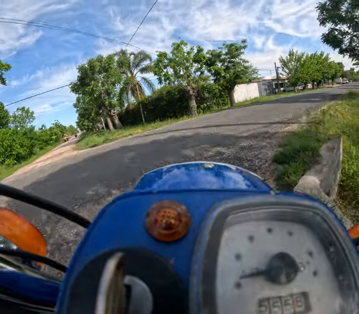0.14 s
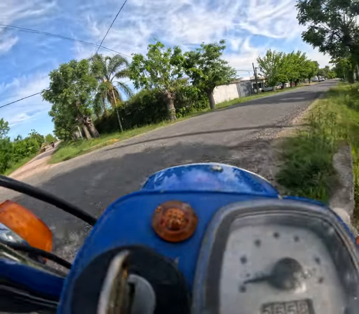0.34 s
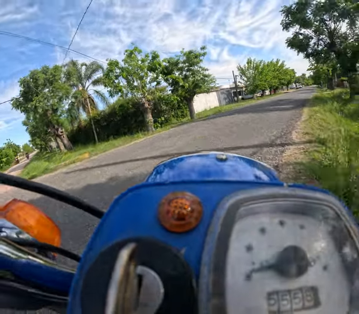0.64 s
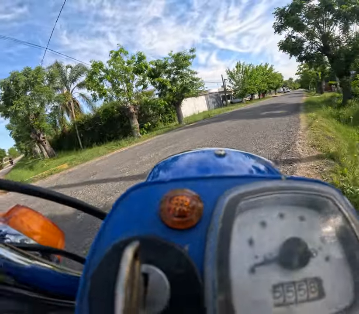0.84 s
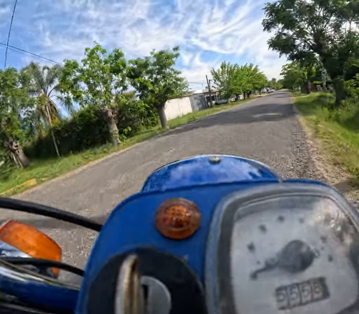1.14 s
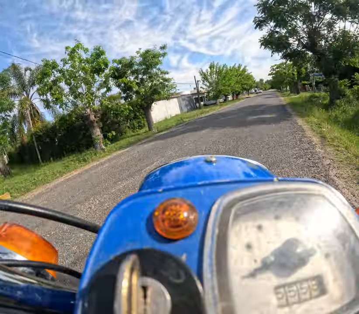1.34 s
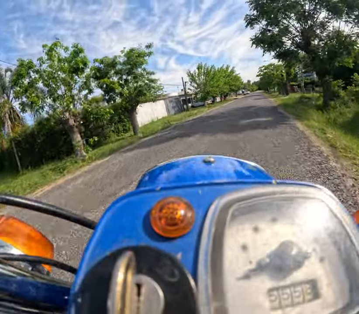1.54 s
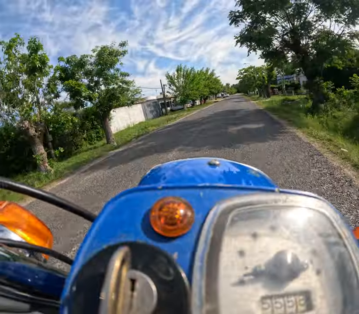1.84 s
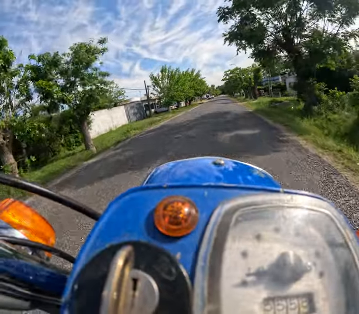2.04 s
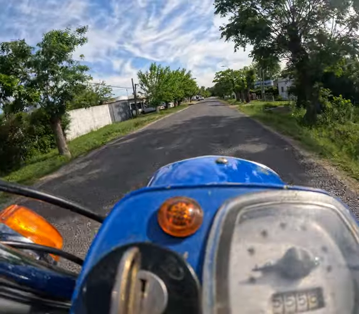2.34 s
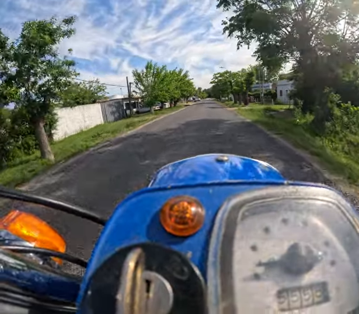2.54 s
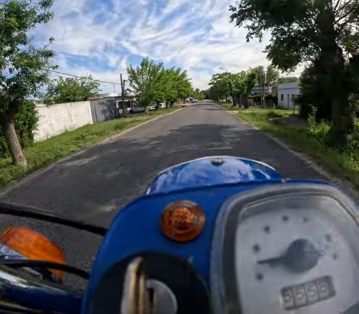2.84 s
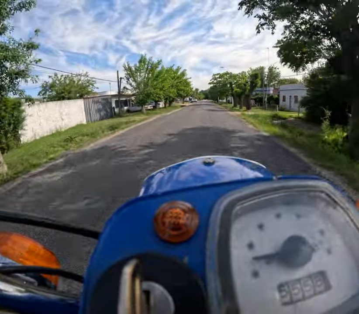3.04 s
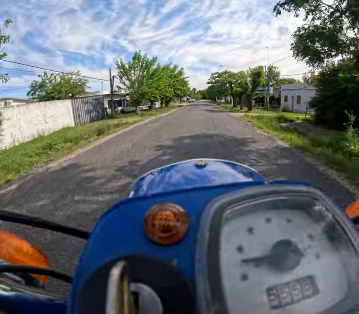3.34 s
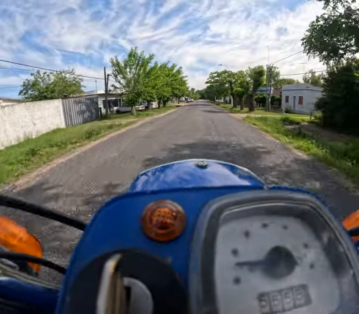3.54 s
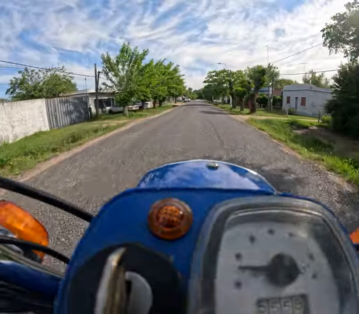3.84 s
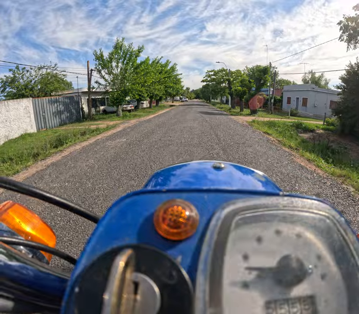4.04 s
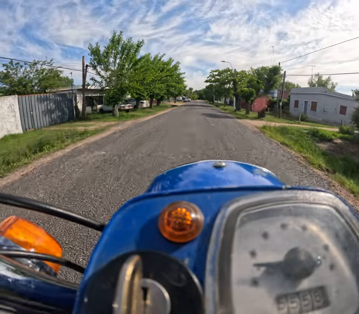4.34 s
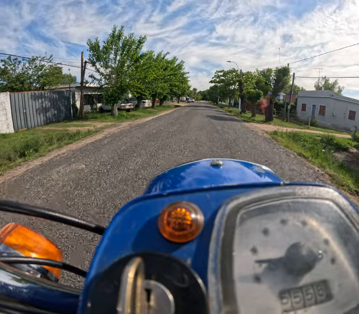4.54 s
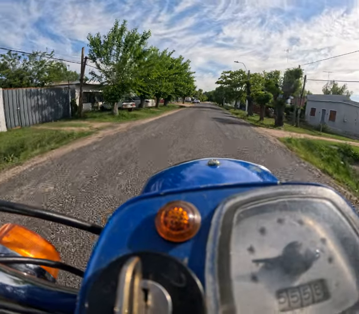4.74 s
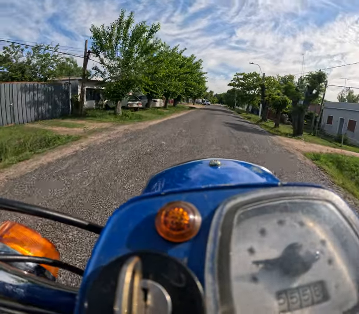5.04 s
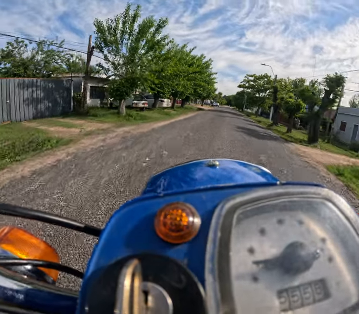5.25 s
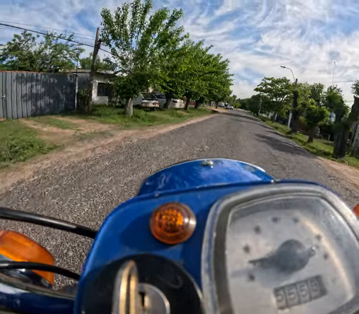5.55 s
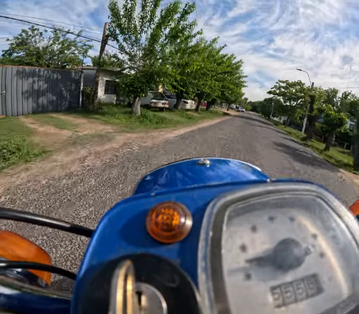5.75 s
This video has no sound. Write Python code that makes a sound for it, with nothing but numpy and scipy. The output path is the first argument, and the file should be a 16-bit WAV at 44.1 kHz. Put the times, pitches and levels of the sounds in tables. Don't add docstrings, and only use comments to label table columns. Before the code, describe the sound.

Close at the handlebar outdoors, a small two-stroke engine drones with a buzzing metallic rasp and rises slightly in pitch. Just before three seconds the throttle shuts, the drone drops away, and the moped coasts with irregular hollow silencer pops, low wind buffeting, loose panel knocks and small bright key rattles on the rough road.

```python
import sys
import numpy as np
from scipy import signal
from scipy.io import wavfile

SR = 44100
rng = np.random.default_rng(int(sys.argv[2]) if len(sys.argv) > 2 else 0)


def gain_from_decibels(decibels):
    exponent = np.asarray(decibels, float) / 20
    return 10 ** exponent


def master(y):
    cut = np.clip(np.atleast_2d(y).T, -1, 1)
    pcm = np.round(cut * 32767)
    wavfile.write(sys.argv[1], SR, pcm.astype(np.int16))


N = 259749

# start_s [s], firing_hz [Hz]
ENGINE_SPEED = [(0, 60), (.3, 63.3), (.63, 67.27), (.85, 70.1), (1.0, 71.45), (1.21, 73.4), (1.5, 73.84),
                (1.83, 74.1), (2.1, 71.98), (2.4, 70.8), (2.81, 68.8), (2.86, 67.66), (3.05, 60.84),
                (3.2, 57)]
# start_s [s], effort_db [dB]
METAL_EFFORT = [(0, -2.5), (.3, -3.5), (.88, 0.5), (1.58, -1.5), (2.6, -2), (2.82, -2), (2.88, -8.5),
                (3.13, -13.5), (3.4, -13.5), (3.62, -11), (4.1, -10), (4.5, -10.5), (5.1, -12),
                (5.53, -12.5), (5.89, -14.5)]
# firing_hz [Hz], level_db [dB]
FRAME_RESPONSE = [(60, -16.5), (63.5, -21), (67.3, -27), (70.5, -21.5), (73.9, -17)]
# pitch_hz [Hz], width_hz [Hz], level_db [dB]
PIPE_MODES = [(195, 50, 0), (365, 90, -2), (575, 90, -8)]
# pitch_hz [Hz], width_hz [Hz], level_db [dB]
SILENCER_MODES = [(341.4, 60.4, 8), (601, 133, -6), (283, 26, -12), (470, 640, -12)]
# pitch_hz [Hz], width_hz [Hz], level_db [dB]
INTAKE_MODES = [(1597, 185, 2), (557, 130, 4.5), (4120, 770, -16)]
# pitch_hz [Hz], width_hz [Hz], level_db [dB]
CASING_MODES = [(1060, 536, 7.5), (1423, 80, -4.5), (727, 420, -0.5), (1834, 620, -6.5), (2182, 735, -1),
                (2808, 510, -5.5), (3183, 940, -3), (4630, 1300, -26.5)]
# pitch_hz [Hz], width_hz [Hz], level_db [dB]
FIN_MODES = [(5000, 2350, 2), (6470, 890, 2.5), (6860, 1770, -2), (9400, 1300, -16)]
# start_s [s] (middle of the gust), rumble_db [dB], flutter_db [dB]
WIND_GUSTS = [(.06, 7, 4.5), (.34, 9, 3), (.72, .3, 8), (1.0, 7, 5.5), (1.19, 9, 6), (1.44, 7, 3),
              (1.77, -10, -1), (2.34, 4, 3), (2.52, 16, 2.5), (2.81, 10, 6), (2.94, 13, 1),
              (3.301, 6, -1.5), (3.55, 9.5, .3), (3.78, 8.5, 0.3), (4.07, 4, 3.5), (4.21, 7, -0.5),
              (4.42, 6, 0.5), (4.52, 2.5, 4), (4.65, 8, 2.5), (5.09, -3, -2), (5.4, -1, 4.5), (5.7, 8, 3)]
# start_s [s], level_db [dB peak], knock_db [dB re level], tick_db [dB re level]
BUMPS = [(0.621, -34, 14, -21), (0.6607, -33.5, 22, -16), (0.728, -28, 8, -30), (0.9323, -29, 8, -28),
         (1.049, -20.5, 7.5, -37.5), (2.1692, -34.5, 0, -27), (3.5914, -37.5, 12.5, -32),
         (3.631, -29, 6, -25), (3.6614, -38.5, -1, -20), (3.693, -29, 5, -26), (3.7503, -30, 11.5, -20.5),
         (3.7733, -44, 3, -21), (3.8327, -35, 11, -25), (4.1623, -29, 10, -26), (5.0329, -30.5, -1, -18),
         (5.143, -31, 8, -25), (5.23, -43, 19, -21), (5.2403, -30.5, 14, -22.5), (5.3217, -28.5, 13.5, -31),
         (5.3324, -42, 14, -27), (5.4067, -39, 11, -16), (5.422, -30.5, 7, -19.5), (5.4644, -39, 8, -31),
         (5.5262, -28.5, 9, -17), (5.693, -32.5, 8, -26), (5.7422, -45.5, 8, -17), (5.7678, -33.5, -1, -23),
         (5.8277, -32.5, -3, -14.5)]
# pitch_hz [Hz], width_hz [Hz], level_db [dB]
KEY_MODES = [(3460, 2600, 13.5), (4970, 340, -16), (5730, 200, 12), (6240, 2000, -4), (6950, 370, 9)]
# pitch_hz [Hz], width_hz [Hz], level_db [dB]
PANEL_MODES = [(1045, 450, -2.5), (2660, 1230, -17.5), (576, 205, -3)]
# pitch_hz [Hz], width_hz [Hz], level_db [dB]
KEY_TIP_MODES = [(9860, 1500, 1.5), (12500, 2000, 1.5), (8600, 1100, 0), (15000, 1500, -8)]
# start_s [s], level_db [dB peak]
STRAY_POPS = [(3.259, -16), (3.376, -33), (3.681, -13.5), (3.761, -35), (3.967, -17), (4.303, -16.5),
              (4.411, -11.5), (4.475, -11.5), (4.538, -13.5), (4.598, -14), (4.915, -10.5), (5.248, -13),
              (5.438, -16), (5.642, -27)]
# start_s [s], level_db [dB peak], pitch_hz [Hz]
KEY_PINGS = [
    (5.0355, -39, 5630),
    (5.1445, -39, 5630),
    (5.1627, -38, 5660),
    (5.5293, -41, 5620),
    (5.8314, -41, 5600),
]

THROTTLE_OPENS_S, THROTTLE_SHUTS_S, ENGINE_STALLS_S = 0.63, 2.835, 3.2


def rms_one(x):
    return x / np.sqrt(np.mean(x ** 2) + 1e-20)


def in_time(rows):
    s, *columns = np.transpose(rows)
    return [np.interp(np.arange(N) / SR, s, column) for column in columns]


def after(s, over):
    return np.clip((np.arange(N) / SR - s) / over + 0.5, 0, 1)


def swell(s, width):
    return np.exp(-((np.arange(N) / SR - s) / width) ** 2)


def drift(rate_hz):
    hop = 40
    r = np.exp(-2 * np.pi * rate_hz * hop / SR)
    noise = rng.standard_normal(N // hop + 2002)
    slow = signal.lfilter([1], [1, -2 * r, r * r], noise)[2000:]
    return np.interp(np.arange(N) / hop, np.arange(len(slow)), rms_one(slow))


def resonate(x, modes):
    out = 0
    for k, (pitch_hz, width_hz, level_db) in enumerate(modes):
        r = np.exp(-np.pi * width_hz / SR)
        poles = [2, -4 * r * np.cos(2 * np.pi * pitch_hz / SR), 2 * r * r]
        y = x + 1e-18
        for _ in range(2):
            y = signal.lfilter([1 - r * r, 0, r * r - 1], poles, y)
        out = out + (-1) ** k * gain_from_decibels(level_db) * y
    return out


def band(x, low_hz, high_hz, order=2):
    return signal.sosfilt(signal.butter(order, [low_hz, high_hz], "band", fs=SR, output="sos"), x)


def even_firing():
    return 1 - after(ENGINE_STALLS_S - 0.03, 0.06)


def gulps(turns):
    pulse = 0.45 * np.cos(2 * np.pi * turns) + 0.3 * np.cos(4 * np.pi * turns)
    return (1 + even_firing() * pulse) * rng.standard_normal(N)


def exhaust(turns, first_db, second_db, pulse_db):
    angle = 2 * np.pi * turns
    drone = gain_from_decibels(first_db + 0.18 * drift(7.1)) * np.sin(angle)
    drone += gain_from_decibels(second_db + 0.6 * drift(9)) * np.sin(2 * angle - 0.4)
    fan = gain_from_decibels(-39 + 3.2 * drift(10)) * np.sin(4.5 * angle)
    fired = np.diff(np.floor(turns + 0.003 * drift(40)), prepend=0) > 0
    kicks = fired * gain_from_decibels(1.2 * rng.standard_normal(N))
    pulses = rms_one(resonate(kicks, PIPE_MODES))
    return even_firing() * (np.sqrt(2) * (drone + fan) + gain_from_decibels(pulse_db) * pulses)


def silencer(level_db):
    puffs_per_s = 45
    puffs = (rng.random(N) < puffs_per_s / SR) * rng.choice([-1, 1], N)
    puffs = puffs * gain_from_decibels(3 * np.minimum(rng.exponential(1, N), 3))
    gas = 0.41 * rms_one(puffs) + rng.standard_normal(N)
    return gain_from_decibels(level_db - 2.1 + 0.53 * drift(8.2)) * rms_one(resonate(gas, SILENCER_MODES))


def intake(turns, level_db):
    return even_firing() * gain_from_decibels(level_db + 1.5) * rms_one(resonate(gulps(turns), INTAKE_MODES))


def metal(turns, casing_db, hiss_db, ring_db):
    shake = drift(24)
    casing = rms_one(band(resonate(rng.standard_normal(N), CASING_MODES), 448, 3940, order=4))
    casing *= gain_from_decibels(casing_db - 0.14 + 0.66 * shake + 0.64 * drift(41))
    casing *= 1 + 0.15 * even_firing() * np.cos(2 * np.pi * turns)
    hiss = rms_one(band(resonate(rng.standard_normal(N), FIN_MODES), 4000, 8030))
    hiss *= gain_from_decibels(hiss_db + 1.0 + 0.99 * shake + 0.53 * drift(40))
    fin_tips = [(12830, 1500, -0.5), (10130, 1900, -4.5)]      # pitch_hz, width_hz, level_db
    ring = rms_one(resonate(gulps(turns), fin_tips))
    ring *= gain_from_decibels(ring_db - 1.0 + 1.3 * shake + 1.3 * drift(60))
    return casing + hiss + ring


def wind(rumble_db, flutter_db):
    rumble = rms_one(band(rng.standard_normal(N), 9.9, 65)) * gain_from_decibels(rumble_db + 3.0)
    buffets_per_s = 600
    buffets = (rng.random(N) < buffets_per_s / SR) * rng.standard_normal(N) + 1e-18
    flutter = band(buffets, 49.5, 156.7) + 0.14 * band(buffets, 124.5, 370)
    return rumble + rms_one(flutter) * gain_from_decibels(flutter_db + 6.5 + 1.0 * drift(26))


def rattles():
    start_s, level_db, knock_db, tick_db = np.transpose(BUMPS)
    at = np.round(start_s * SR).astype(int)
    hits = np.zeros((3, N))
    hits[:, at] = gain_from_decibels(level_db - 7.5), gain_from_decibels(level_db + knock_db - 2.0), gain_from_decibels(level_db + tick_db - 4)
    rise, quick, slow = np.exp(-1 / (np.array([0.0012, 0.006, 0.025]) * SR))
    burst = signal.lfilter([1], [1, -quick], hits) + 0.12 * signal.lfilter([1], [1, -slow], hits)
    burst = signal.lfilter([1 - rise], [1, -rise], burst)
    contacts = rng.standard_normal((3, N)) * gain_from_decibels(2.5 * drift(300))
    out = 0
    for c, b, modes in zip(contacts, burst, (KEY_MODES, PANEL_MODES, KEY_TIP_MODES)):
        out = out + resonate(c * b, modes) / np.std(resonate(c, modes))
    return out


def strike(start_s, level_db, pitch_hz, t60):
    age = np.maximum(np.arange(N) / SR - start_s, 0)
    return gain_from_decibels(level_db - 60 * age / t60) * np.sin(2 * np.pi * pitch_hz * age)


def pops():
    return sum(strike(s, db - 5.5, 347.0, t60=0.14) for s, db in STRAY_POPS)


def pings():
    return sum(strike(s, db, hz, t60=0.041) for s, db, hz in KEY_PINGS)


def scene():
    (firing_hz,), (effort_db,) = in_time(ENGINE_SPEED), in_time(METAL_EFFORT)
    turns = 0.2 + np.cumsum(firing_hz) / SR
    opened, shut = after(THROTTLE_OPENS_S, 0.055), after(THROTTLE_SHUTS_S, 0.036)
    slip = 1 - after(1.0, 0.29)

    fade_s = 0.27
    first_db = np.interp(firing_hz, *np.transpose(FRAME_RESPONSE))
    first_db += 3 * shut - 24 * after(ENGINE_STALLS_S - fade_s / 2, fade_s)
    second_db = -24 * (1 - opened) - 18 * (opened - shut) - 39 * shut
    pulse_db = -33.5 + 8.5 * slip - 11 * shut

    silencer_db = -24.5 - 8.5 * after(1.47, 1.1) + 6.5 * shut * swell(4.49, 1)

    wide = after(THROTTLE_OPENS_S, 0.2)
    intake_db = -49 * (1 - wide) + wide * (-36.5 + 2 * np.arange(N) / SR)
    intake_db -= 17 * after(THROTTLE_SHUTS_S, 0.34)

    lull_db, rough = -10.5 * swell(3.1, 0.46), after(4.9, 0.2)
    casing_db = -25 + 0.76 * effort_db + 1.66 * slip
    hiss_db = -48 + effort_db + 0.2 * lull_db + 2.5 * rough
    ring_db = -62 + 1.25 * effort_db + lull_db + 6.5 * rough

    gust_s = 0.073
    rumble_db, flutter_db = sum(np.outer(db, swell(s, gust_s)) for s, *db in WIND_GUSTS)
    rumble_db += -41 + 6.5 * shut
    flutter_db += -32

    mix = exhaust(turns, first_db, second_db, pulse_db) + silencer(silencer_db)
    mix += intake(turns, intake_db) + metal(turns, casing_db, hiss_db, ring_db)
    mix += wind(rumble_db, flutter_db) + rattles() + pops() + pings()
    return mix[None]


def top_cut(x):
    return signal.sosfilt(signal.butter(12, 15700, fs=SR, output="sos"), x)


def record(dry):
    dull = signal.sosfilt(signal.butter(2, 14200, fs=SR, output="sos"), dry)
    return top_cut(1.3 * np.tanh(dull / 1.3))


dry = scene()
out = record(dry)
master(out)
```